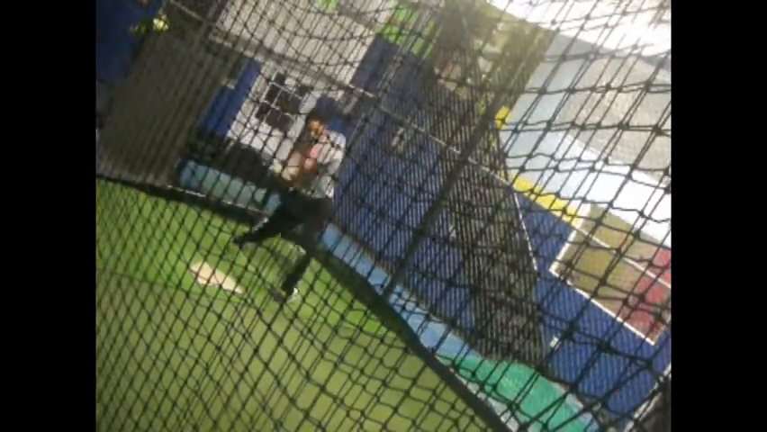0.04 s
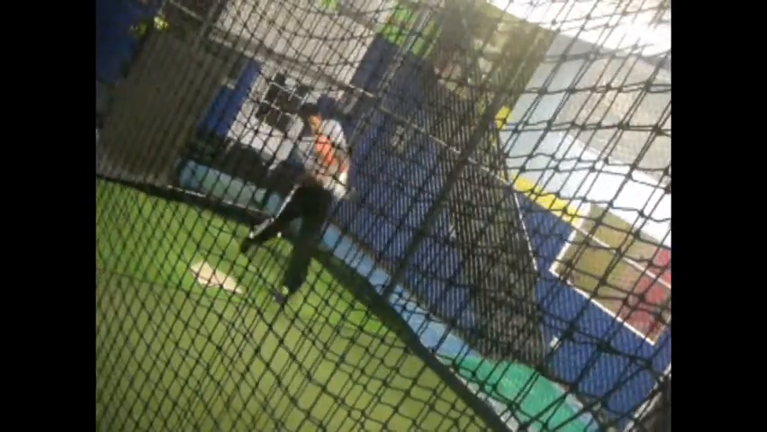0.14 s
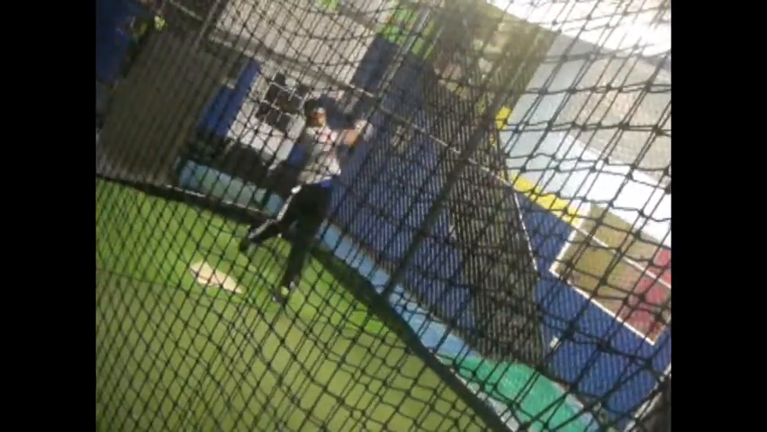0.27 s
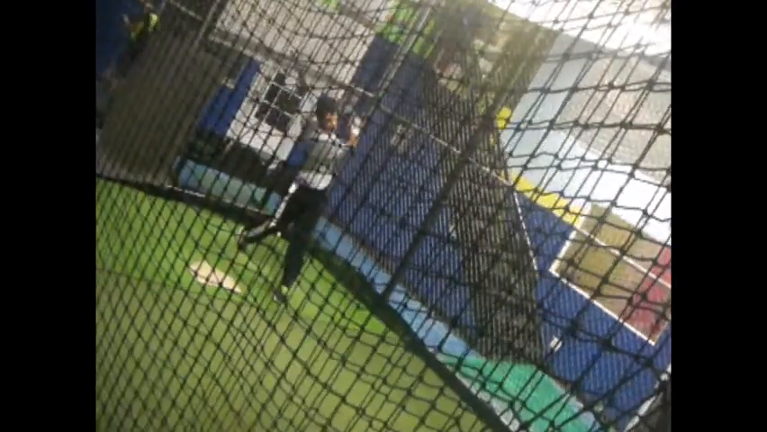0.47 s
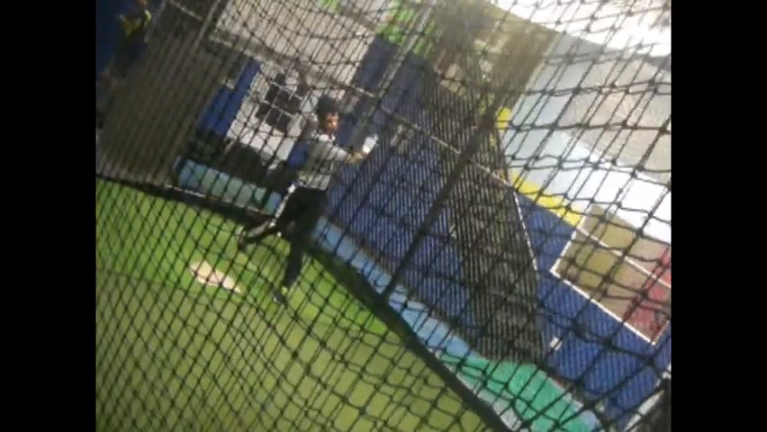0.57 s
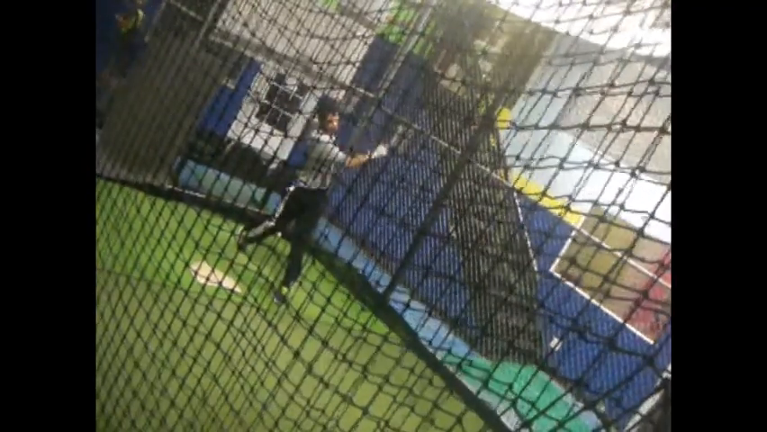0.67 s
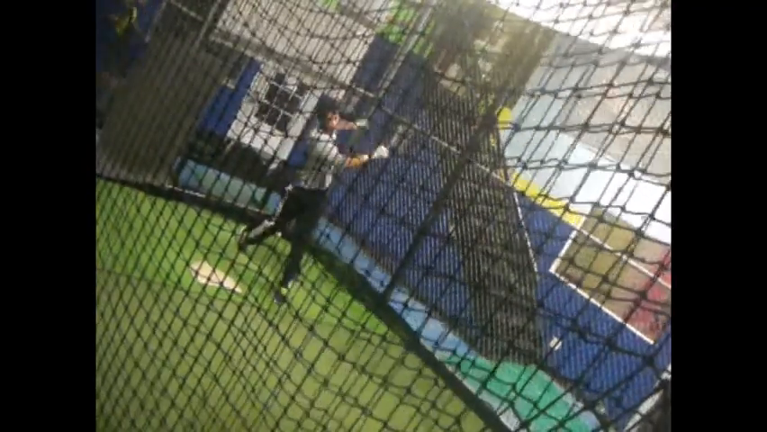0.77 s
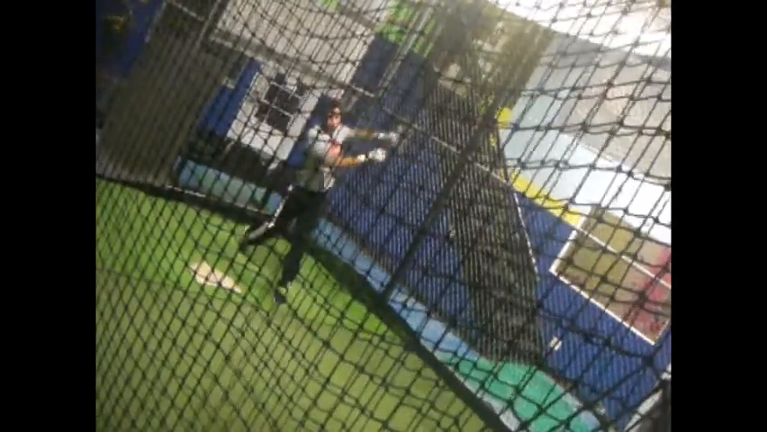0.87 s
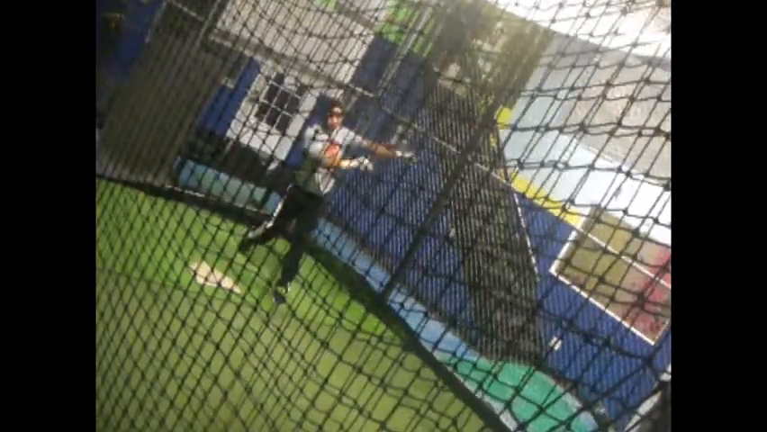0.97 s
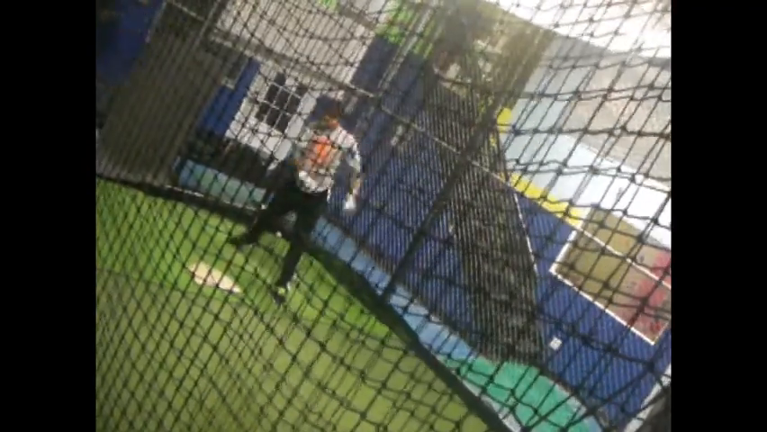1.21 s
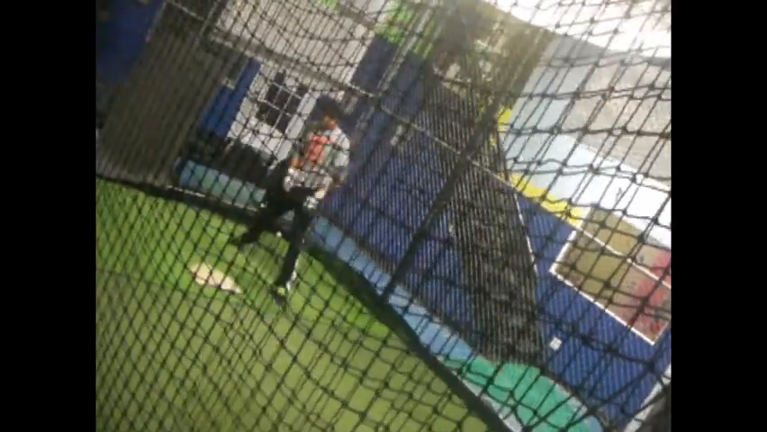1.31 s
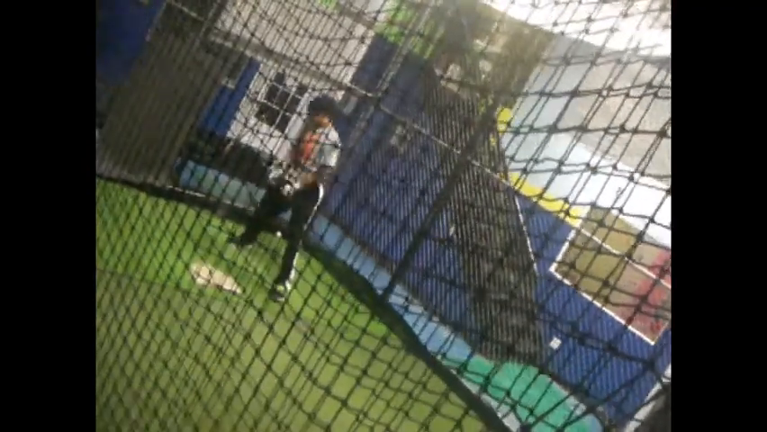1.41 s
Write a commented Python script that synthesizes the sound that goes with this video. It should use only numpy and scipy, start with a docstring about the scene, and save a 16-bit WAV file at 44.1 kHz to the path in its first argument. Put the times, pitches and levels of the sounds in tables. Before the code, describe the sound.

A bat cracks once against a ball, echoing through an indoor batting cage.

```python
"""Indoor batting cage, one swing: a tick, then the bat meets the ball with a thud and a double crack.
Hard surfaces slap it back and the hall rings on. The ball runs into the net; net and clothes
rustle and rumble, with two more ticks and faint squeaks, over the ventilation.
Filtered stereo sound: bass centred, hollow middle, shrill band on both sides, other treble far right."""
import sys
import numpy as np
from scipy import signal
from scipy.fft import rfft, irfft
from scipy.io import wavfile

SR = 44100
rng = np.random.default_rng(int(sys.argv[2]) if len(sys.argv) > 2 else 0)


def materialize(psi):
    """Save the field psi as 16-bit PCM at rate SR to the path in sys.argv[1].

    A 1-D psi becomes a single channel; in a 2-D psi each row is a channel.
    """
    bounded = np.clip(np.atleast_2d(psi).T, -1, 1)
    quanta = np.round(bounded * 32767).astype(np.int16)
    wavfile.write(sys.argv[1], SR, quanta)


N = 63945
T = np.arange(N) / SR
HZ = np.maximum(np.fft.rfftfreq(N, 1 / SR), 1)
HIT_S = .2282
HOLLOW_LOW_HZ, HOLLOW_HIGH_HZ, CUTOFF_HZ = 2720, 5044, 15800


# Crack spectrum: f/Hz, level/dB
CRACK_SPECTRUM = [(500, -25), (1400, -26), (2200, -36), (4800, -26), (5200, -8), (6600, 2), (8000, 4),
                  (9000, -1), (11000, -4), (13000, -4), (16000, -7)]
CRACK_DB, SPREAD_S = 2.5, .001946

def crack(start_s):
    """Hard contact: one pulse, spread as high bending waves outrun low ones."""
    arrival_s = start_s + SPREAD_S * np.maximum(1 - HZ / CUTOFF_HZ, 0) ** 2
    phase = 2 * np.pi * np.cumsum(arrival_s) * SR / N
    magnitude = from_db(CRACK_DB + at_hz(CRACK_SPECTRUM, HZ)[0])
    return irfft(magnitude * np.exp(-1j * (phase - phase[0])), N)


def thud(start_s=.2266, hz=138, t60_s=.014, level_db=-17):
    """The ball squashes just before the crack: a damped sine."""
    age = np.maximum(T - start_s, 0)
    ring = np.sin(2 * np.pi * hz * age) * from_db(-60 * np.minimum(age / t60_s, 4))
    return from_db(level_db) * low_pass(ring, hz=427)


def bat(recoil_s=.0012, recoil_db=-4):
    """Bat on ball: crack, weaker recoil crack, thud."""
    return crack(HIT_S) + from_db(recoil_db) * crack(HIT_S + recoil_s) - thud()


# Echoes off hard surfaces: t/s, level/dB, low-pass f/Hz
SLAP_ECHOES = [(.2391, -8, 19000), (.2421, -9, 9000), (.2510, -12, 11000), (.2657, -13, 7000),
               (.2692, -14, 7000), (.3047, -15, 6000), (.3174, -14, 6000), (.3480, -15, 6000),
               (.3999, -15, 6000)]
# Ticks around the cage: t/s, level/dB, low-pass f/Hz
CAGE_TICKS = [(.1022, -21, 12500), (.6629, -30, 6000), (.7622, -28, 6000)]

def far_cracks(table):
    """Weaker, thinner cracks from further off."""
    return above_hollow(sum(from_db(db) * low_pass(crack(start_s), hz) for start_s, db, hz in table))


# Hall reverberation: f/Hz, level/dB, T60/s, build-up/s
HALL_BANDS = [(40.7, -6.5, 0.83, 0.015), (102, -3.5, 2.34, 0.0038), (265, -4.5, 0.98, 0.013),
              (612, -26.5, 2.82, 0.018), (1326, -35, 2.33, 0.018), (2700, -39, 1.73, 0.0067),
              (3320, -50.5, 7.5, 0.0067), (5100, -64, 3.7, 0.034), (4850, -4, 1.31, 0.029),
              (6060, -3, 1.435, 0.051), (8510, -4, 0.92, 0.0013), (11320, -20.5, 0.91, 0.0024),
              (15800, -12.5, 0.23, 0.0017)]
HALL_DB = -19

def hall():
    """Diffuse sound builds after the hit; each quarter octave decays at its own rate."""
    white = white_pair()
    age = np.maximum(T - HIT_S, 0)
    edges_hz = HOLLOW_HIGH_HZ * 2 ** (np.arange(-32, 8) / 4)
    reverb = 0
    for low, high in zip(edges_hz, edges_hz[1:]):
        db, t60_s, build_s = at_hz(HALL_BANDS, np.sqrt(low * high))
        rise = 1 - np.exp(-age / build_s)
        decay = from_db(HALL_DB + db - 60 * age / t60_s)
        band = irfft(white * ((HZ >= low) & (HZ < high)), N)
        reverb = reverb + rise * decay * band
    return reverb * flutter()


# Net and cloth swishes: peak t/s, length/s, rustle level/dB, rumble level/dB, air level/dB
NET_SWISHES = [(0.153, 0.052, -60, -74, -49.5), (0.213, 0.021, -48, -53.5, -51),
               (0.493, 0.026, -45, -45, -74), (0.542, 0.048, -42.5, -46, -66),
               (0.697, 0.21, -63, -64.5, -59.5), (0.875, .13, -52, -65, -57),
               (1.025, 0.14, -58.5, -60, -76), (1.293, 0.12, -57, -56.5, -59.5),
               (1.434, 0.076, -56.5, -62.5, -81)]
# Rustle, rumble and air spectra: f/Hz, relative level/dB
RUSTLE_SPECTRUM = [(5000, -3.5), (6500, 5.5), (9000, 4.5), (11000, -9.5), (13000, -2.5), (15500, -8)]
RUMBLE_SPECTRUM = [(25, -17), (70, 1.5), (150, 3), (300, -5), (450, -11.5), (650, -24), (1400, -31),
                   (2500, -38), (4000, -35.5)]
AIR_SPECTRUM = [(8000, -12), (9300, 0), (11300, -18.5), (12600, -2), (15500, -5)]

def net_and_clothes():
    """Net and batter's clothes swish: swells of rustle, low rumble and airy top."""
    rustle_gain, rumble_gain, air_gain = sum(
        swell(peak_s, length_s) * from_db(dbs)[:, None] for peak_s, length_s, *dbs in NET_SWISHES)
    rustle = rustle_gain * above_hollow(noise(RUSTLE_SPECTRUM))
    rumble = rumble_gain * noise(RUMBLE_SPECTRUM)
    air = air_gain * above_hollow(noise(AIR_SPECTRUM))
    return (rustle + rumble + air) * flutter()


# Squeaks: peak t/s, length/s, level/dB
HIGH_SQUEAKS = [(.61, .012, -59), (.737, .012, -51)]
# Squeak spectrum: f/Hz, relative level/dB
SQUEAK_SPECTRUM = [(13900, -40), (14250, 0), (14450, 0), (14800, -40)]

def squeaks():
    """Faint, very high peeps of narrow-band noise."""
    envelope = sum(swell(peak_s, length_s) * from_db(db) for peak_s, length_s, db in HIGH_SQUEAKS)
    return envelope * noise(SQUEAK_SPECTRUM)


# Duct rumble and air hiss spectra: f/Hz, relative level/dB
DUCT_SPECTRUM = [(25, -23), (50, 8.5), (90, 5), (180, -2.5), (350, -6), (650, -25), (810, -13.5),
                 (1000, -27.5), (1400, -41), (4000, -33)]
HISS_SPECTRUM = [(5000, -7), (6500, 4), (8800, 3.5), (11000, -12), (12800, -0.5), (15500, -5)]
DUCT_DB, HISS_DB = -62.5, -57

def ventilation():
    """Steady rumble with a faint duct resonance, plus air hiss."""
    rumble = from_db(DUCT_DB) * noise(DUCT_SPECTRUM)
    hiss = from_db(HISS_DB) * above_hollow(noise(HISS_SPECTRUM))
    return rumble + hiss


def from_db(db):
    """Decibels to gain."""
    return 10 ** (np.asarray(db) / 20)


def at_hz(table, hz):
    """Interpolate table columns over log frequency."""
    table_hz, *columns = np.transpose(table)
    return [np.interp(np.log(hz), np.log(table_hz), column) for column in columns]


def low_pass(x, hz):
    """Two-pole Butterworth."""
    return signal.sosfilt(signal.butter(2, min(hz, .45 * SR), fs=SR, output="sos"), x + 1e-18)


def above_hollow(x, ramp_hz=200):
    """Keep only the treble."""
    return irfft(rfft(x) * np.clip((HZ - HOLLOW_HIGH_HZ) / ramp_hz + 1, 0, 1), N)


def white_pair():
    """Stereo white spectrum: mono up to the hollow's top edge, independent above."""
    left, right = rfft(rng.standard_normal((2, N)))
    return np.array([np.where(HZ < HOLLOW_HIGH_HZ, right, left), right])


def unit_rms(x):
    """Scale to RMS 1."""
    return x / np.sqrt(np.mean(x ** 2) + 1e-20)


def noise(spectrum):
    """Band-limited stereo noise of a given colour, RMS 1."""
    in_band = (HZ > spectrum[0][0] * .5) & (HZ < spectrum[-1][0] * 1.1)
    colour = from_db(at_hz(spectrum, HZ)[0])
    return unit_rms(irfft(white_pair() * in_band * colour, N))


def flutter(depth_db=1.5, bandwidth_hz=111):
    """Fast random gain flicker."""
    return from_db(depth_db * unit_rms(low_pass(rng.standard_normal(N), bandwidth_hz)))


def swell(peak_s, length_s):
    """Gaussian envelope."""
    return np.exp(-2 * ((T - peak_s) / length_s) ** 2)


def scene():
    """The hit, its echoes and the cage around it."""
    impacts = bat() + far_cracks(SLAP_ECHOES) + far_cracks(CAGE_TICKS)
    return impacts + hall() + net_and_clothes() + squeaks() + ventilation()


LOW_CUT_HZ, HOLLOW_DB, LEFT_TREBLE_DB = 40, -10.5, -59
PRESENCE_LOW_HZ, PRESENCE_HIGH_HZ, PRESENCE_LEFT_DB, PRESENCE_RIGHT_DB = 5937, 6987, 4, 10
DIP_HZ, DIP_WIDTH_HZ, DIP_DB = 7786, 412, -18.5

def record(dry):
    """Stereo filter: bass centred, hollow middle, shrill band on both sides, other treble far right."""
    def above(edge_hz, width_hz):
        return .5 + .5 * np.tanh((HZ - edge_hz) / width_hz)

    low_cut = HZ / np.hypot(HZ, LOW_CUT_HZ)
    treble = above(HOLLOW_HIGH_HZ, 43)
    hollow = from_db(HOLLOW_DB * above(HOLLOW_LOW_HZ, 600) * (1 - treble))
    presence = above(PRESENCE_LOW_HZ, 90) * (1 - above(PRESENCE_HIGH_HZ, 210))
    dip = np.exp(-((HZ - DIP_HZ) / DIP_WIDTH_HZ) ** 2)
    left = 1 - treble + treble * from_db(LEFT_TREBLE_DB) + presence * from_db(PRESENCE_LEFT_DB)
    right = from_db(PRESENCE_RIGHT_DB * presence + DIP_DB * dip)
    coloured = irfft(rfft(dry) * low_cut * hollow * np.array([left, right]), N)
    high_cut = signal.ellip(10, .3, 80, CUTOFF_HZ, fs=SR, output="sos")
    return signal.sosfilt(high_cut, coloured)


dry = scene()
out = record(dry)
materialize(out)
```